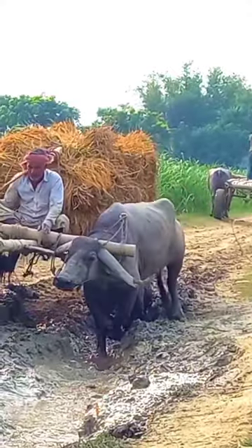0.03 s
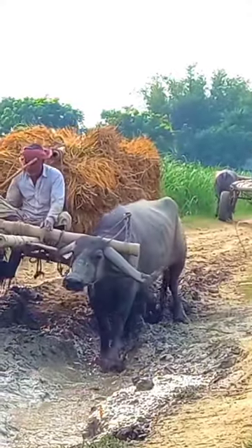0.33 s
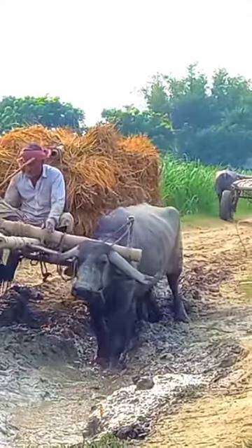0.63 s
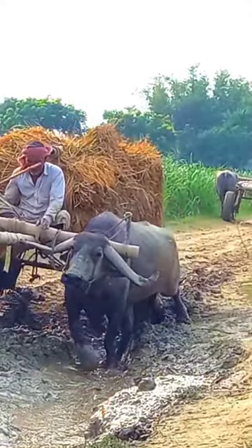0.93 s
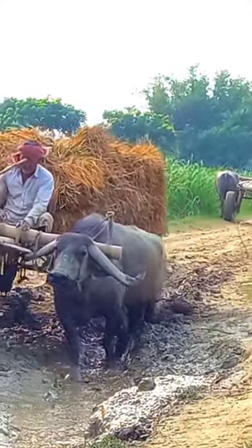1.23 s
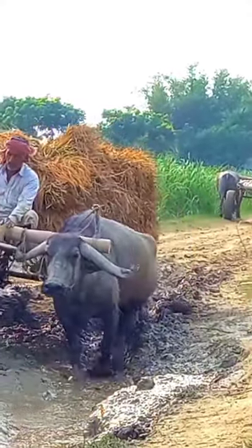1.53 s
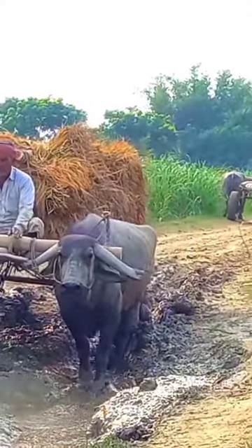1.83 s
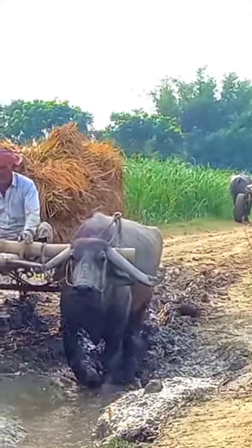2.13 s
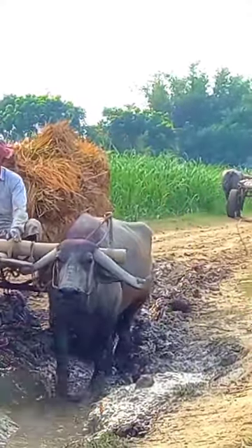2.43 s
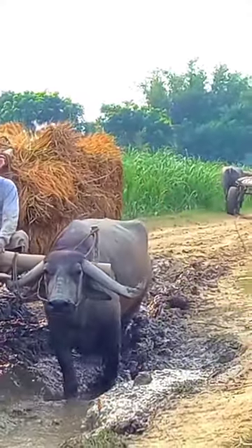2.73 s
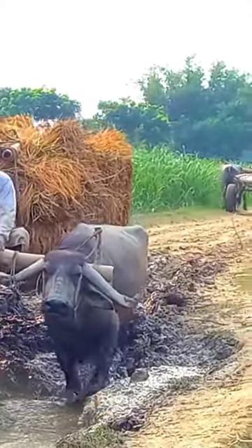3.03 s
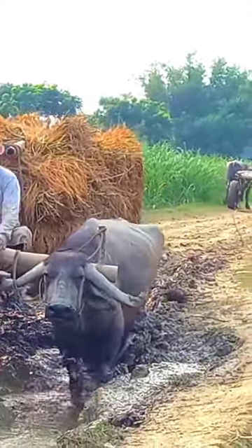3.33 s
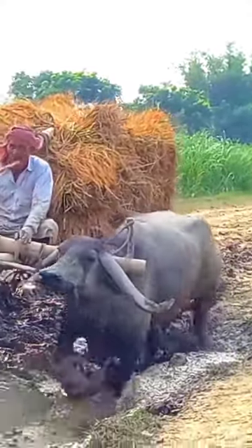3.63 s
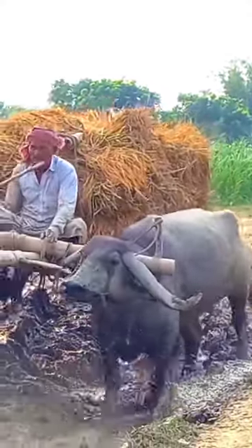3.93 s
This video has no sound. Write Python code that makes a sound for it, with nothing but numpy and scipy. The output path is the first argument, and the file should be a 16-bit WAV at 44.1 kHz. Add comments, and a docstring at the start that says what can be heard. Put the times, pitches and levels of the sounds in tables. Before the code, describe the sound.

A wading buffalo's hooves squelch and plop in wet mud, ending with a loud splash.

```python
"""A water buffalo drags a cart through deep mud into a shallow pool, coming closer, to a loud splash.
Each hoof squelches: gulping air pockets, smacking mud and a fizz of spray, all clouds of tiny bubbles.
Single cavities plop, flung mud slaps down and the soft ground thuds under the weight.
Stirred water sloshes and drips between the steps; a far bird chirps over the quiet of open fields."""
import sys
import numpy as np
from scipy import signal
from scipy.fft import rfft, irfft, next_fast_len
from scipy.io import wavfile
from scipy.ndimage import uniform_filter1d

SR = 44100
rng = np.random.default_rng(int(sys.argv[2]) if len(sys.argv) > 2 else 0)


def dump_mix(stems):
    """Bounce the given channels to the path in sys.argv[1] as a 16-bit WAV at rate SR."""
    frames = np.atleast_2d(stems).T  # one column per channel
    limited = np.clip(frames, -1, 1)  # hard clip at full scale
    pcm = np.round(limited * 32767).astype(np.int16)
    wavfile.write(sys.argv[1], SR, pcm)


N = 176400
T = np.arange(N) / SR

# tone colour of the spray hiss, with the microphone's colouring: frequency_hz, level_db
SPRAY_EQ = [(1200, -16.5), (2400, -4.5), (3100, -10.5), (4000, -6), (4800, -5), (6300, -1), (6900, -5),
            (7400, -12), (9000, -9), (11000, -5.5), (15000, -7.5)]
# stereo image of the wet sounds, widest in the treble: frequency_hz, correlation (0-1)
MUD_IMAGE = [(60, 0.45), (500, 0.89), (1100, 0.75), (2000, 0.34), (4000, 0.13), (9000, 0.05)]


def amp(db):
    """Decibels to gain."""
    return 10 ** (np.asarray(db) / 20)


def unit(x):
    """Scale to rms 1."""
    return x / np.sqrt(np.mean(x ** 2) + 1e-20)


def curve_at(points, hz):
    """Read a curve of (frequency_hz, value) points along a log frequency axis."""
    points_hz, values = np.transpose(points)
    return np.interp(np.log(hz + 1), np.log(points_hz + 1), values)


def filtered(x, response):
    """Filter x by a gain given as a function of frequency."""
    size = next_fast_len(N + 8192)
    return irfft(rfft(x, size) * response(np.fft.rfftfreq(size, 1 / SR)), size)[..., :N]


def spread(pair, eq, image):
    """Turn two unrelated signals into stereo of rms 1 with the given tone colour and image."""
    def mid_side_gains(hz):
        angle = np.arccos(np.clip(curve_at(image, hz), -1, 1)) / 2
        return amp(curve_at(eq, hz)) * np.array([np.cos(angle), np.sin(angle)])
    mid, side = filtered(pair, mid_side_gains)
    return unit(np.array([mid + side, mid - side]))


def burst(peak_s, rise_s, decay_s):
    """An envelope that swells to a peak and falls away, both exponentially."""
    exponent = np.where(T < peak_s, (T - peak_s) / rise_s, (peak_s - T) / decay_s)
    return np.exp(exponent.clip(-40, 0))


def field_air():
    """The quiet of open fields: a wide bed of low rumble and faint hiss."""
    # tone colour of the background air, with the microphone's colouring: frequency_hz, level_db
    air_eq = [(20, -46), (45, -18), (65, 6.5), (95, 5.5), (160, -3.5), (330, -9.5), (540, -14), (780, -20),
              (1400, -25.5), (2500, -26), (3100, -33), (4200, -22.5), (6300, -17), (7600, -26.5),
              (10000, -27), (15000, -34)]
    # stereo image of the air: frequency_hz, correlation (0-1)
    air_image = [(40, 0.13), (150, 0.29), (500, 0.52), (2000, 0.085), (8000, 0.072)]
    return amp(-63) * spread(rng.standard_normal((2, N)), air_eq, air_image)


def far_bird():
    """Thin chirps that arch in pitch, blurred by the trees they pass through."""
    # bird calls: centre_s, top_pitch_hz, level_db
    chirps = [(.663, 3600, -72), (1.03, 3550, -75)]
    half_length_s, arch_hz, blur_hz = 0.027, 390, 130
    blur = unit(filtered(rng.standard_normal((2, 2, N)), lambda hz: np.exp(-(hz / blur_hz) ** 2)))
    out = np.zeros((2, N))
    for centre_s, top_hz, db in chirps:
        offset = np.clip((T - centre_s) / half_length_s, -4, 4)
        phase = 2 * np.pi * np.cumsum(top_hz - arch_hz * offset ** 2) / SR
        out += amp(db) * np.exp(-offset ** 2) * (blur[0] * np.sin(phase) + blur[1] * np.cos(phase))
    return out


def cart_and_bank_echo(x):
    """A short, weak scatter from the cart and the banks that changes as the hooves move."""
    level_db, t60_s, predelay_s = -9.5, 0.1, 0.003
    width, mono_below_hz = 0.45, 1800
    t = np.arange(SR // 5) / SR
    hop = N // 20
    out = np.zeros((2, N + SR))
    for start in range(-hop, N, hop):  # each overlapping slice gets its own tail
        tail = rng.standard_normal((2, len(t))) * amp(-60 * t / t60_s) * (t > predelay_s)
        at = np.arange(max(start, 0), min(start + 2 * hop, N))
        piece = x[at] * np.sin(np.pi * (at - start) / (2 * hop))
        echo = signal.fftconvolve(piece[None], tail / np.linalg.norm(tail[0]), axes=1)
        out[:, at[0]:at[0] + echo.shape[1]] += echo
    mid, side = out[:, :N]
    side = width * filtered(side, lambda hz: hz ** 2 / (hz ** 2 + mono_below_hz ** 2))
    return amp(level_db) * np.array([mid + side, mid - side])


def ground_thuds():
    """The soft ground gives a few slow swings under each push, with a rough rumble."""
    # weight landing on soft ground: peak_s, pitch_hz, half_length_s, level_db
    thuds = [(.648, 89, 0.022, -53), (1.166, 89, 0.028, -54.5), (1.355, 100, 0.0085, -50.5),
             (1.404, 83, 0.018, -55), (2.16, 101, 0.009, -45.5), (2.194, 85.5, 0.0081, -41.5),
             (2.226, 84.6, 0.0088, -35.5), (2.573, 80, 0.02, -42), (2.7, 68, 0.022, -48.5),
             (3.302, 89, 0.0093, -45.5), (3.334, 85, 0.018, -48), (3.507, 116, 0.013, -43.5),
             (3.551, 91, 0.038, -48), (3.807, 94.5, 0.055, -53), (3.921, 101, 0.033, -46)]
    # tone colour of the rumble: frequency_hz, level_db
    rumble_eq = [(20, -15), (55, 1.5), (90, 0.5), (150, -4.5), (240, -6.5), (400, -42)]
    rumble_db, swing_left_right_db = -9, [[-1], [-3]]
    swing, weight = np.zeros(N), np.zeros(N)
    for peak_s, hz, half_length_s, db in thuds:
        envelope = amp(db) * np.exp(-np.minimum(np.abs((T - peak_s) / half_length_s) ** 1.8, 40))
        swing += envelope * np.cos(2 * np.pi * hz * (T - peak_s))
        weight += envelope
    mid, side = weight * spread(rng.standard_normal((2, N)), rumble_eq, image=[(100, 0)])
    return amp(swing_left_right_db) * swing + amp(rumble_db) * np.array([mid + side, mid - side])


def mud_slaps():
    """Gobs of flung mud land with a brief, bright snap."""
    # gobs landing: peak_s, level_db
    slaps = [(.2164, -56.5), (1.3626, -50.5), (1.8594, -47), (2.5521, -49.5), (2.738, -52), (2.9614, -54),
             (3.345, -46), (3.6855, -37), (3.84, -43)]
    envelope = sum(amp(db) * burst(peak_s, rise_s=0.001, decay_s=0.005) for peak_s, db in slaps)
    return envelope * spread(rng.standard_normal((2, N)), SPRAY_EQ, MUD_IMAGE)


def pocket_plops():
    """An air pocket tears open with a splat and rings for a few cycles while its pitch rises."""
    # single air pockets bursting: start_s, pitch_hz, level_db
    plops = [(.315, 540, -47.5), (.789, 4170, -53), (.826, 517, -44), (.826, 1470, -47.5),
             (.962, 1323, -48), (1.547, 1420, -52), (1.588, 1600, -50), (1.616, 414, -43.5),
             (1.786, 560, -47.5), (1.956, 416, -51), (1.988, 1650, -44), (2.106, 541, -38.5),
             (2.358, 553, -44), (2.637, 920, -49), (2.676, 990, -41.5), (2.689, 550, -54),
             (2.740, 1050, -50), (2.799, 890, -45), (2.808, 953, -44.5), (2.96, 2043, -43),
             (3.189, 560, -45), (3.19, 940, -47), (3.264, 2140, -47), (3.503, 1410, -44.5),
             (3.6, 2100, -39.5), (3.647, 1440, -37), (3.662, 1320, -36.5), (3.706, 1570, -38),
             (3.72, 2180, -40), (3.7603, 533, -27.5), (3.764, 590, -30), (3.777, 1595, -27),
             (3.81, 284, -37), (3.821, 592, -25), (3.865, 427, -40), (3.974, 605, -38)]
    swell_s, glide, splat_db = 0.0018, 0.058, -13
    t = np.arange(SR // 16) / SR
    out = np.zeros(N + SR)
    for start_s, hz, db in plops:
        decay_s = 0.0035 * (600 / hz) ** 0.15  # smaller pockets die sooner
        envelope = (1 - np.exp(-(t / swell_s) ** 2)) * np.exp(-t / decay_s)
        pitch_hz = hz * (1 + glide * np.tanh(t / decay_s - 1))
        ring = np.sin(2 * np.pi * np.cumsum(pitch_hz) / SR)
        octave_band = signal.butter(2, [hz / np.sqrt(2), hz * np.sqrt(2)], "band", fs=SR)
        splat = amp(splat_db) * unit(signal.lfilter(*octave_band, rng.standard_normal(len(t))))
        out[round(start_s * SR):][:len(t)] += amp(db) * envelope / envelope.max() * (ring + splat)
    return out[:N]


def bubbles(eq, low_hz, high_hz, decay_cycles, scatter_db, count, grain_samples):
    """A stereo cloud of tiny bubbles at random times and pitches, each rising as it rings out."""
    when, pitch, strength, angle = rng.random((count, 4)).T[:, :, None]
    cycles = low_hz * (high_hz / low_hz) ** pitch * np.arange(grain_samples) / SR
    age = cycles / decay_cycles
    gain = amp(scatter_db * np.minimum(-np.log(1 - strength), 4))
    envelope = gain * np.exp(-age) * (1 - np.exp(-2 * cycles))
    rings = envelope * np.sin(2 * np.pi * cycles * (1 + 0.038 * np.minimum(age, 2)))
    at = ((when * N).astype(int) + np.arange(grain_samples)).ravel()
    pair = [np.bincount(at, (rings * pan(2 * np.pi * angle)).ravel(), N)[:N] for pan in (np.cos, np.sin)]
    return spread(unit(np.array(pair)), eq, MUD_IMAGE)


def levelled(cloud):
    """Take the slow swells out of a bubble cloud and keep its grain."""
    power = uniform_filter1d(np.mean(cloud ** 2, 0), size=600)
    return cloud / np.sqrt(np.abs(power) + 1e-3)


def approach(x):
    """The splashes brighten as the buffalo comes closer."""
    # high-shelf automation: time_s, gain_db
    treble_ride = [(0, -10.5), (1.3, -2), (2.3, 0.5), (2.9, 4), (3.6, 1.5)]
    shelf_hz = 8000
    treble = filtered(x, lambda hz: 1 - 1 / (1 + (hz / shelf_hz) ** 6))
    return x + treble * (amp(np.interp(T, *np.transpose(treble_ride))) - 1)


def hoof_squelches():
    """Hooves and stirred water drive three sizes of bubble (gulp, smack, spray) and loose drips."""
    # squelches and splashes: peak_s, rise_s, decay_s, gulp_db, smack_db, spray_db
    squelches = [ (0.1, 0.0025, 0.021, -59.5, -65.5, -63.5), (0.302, 0.0011, 0.023, -59.5, -53, -57),
                 (0.402, 0.002, 0.017, -56, -66, -58.5), (0.557, 0.0041, 0.015, -52, -50, -44.5),
                 (.715, 0.0031, 0.007, -61, -62.5, -57), (0.829, 0.0073, 0.017, -54, -55.5, -53),
                 (0.963, 0.0016, 0.025, -62.5, -62.5, -84), (1.042, 0.014, 0.059, -66, -61, -62.5),
                 (1.159, 0.0087, 0.016, -73, -60.5, -66), (1.319, 0.007, 0.033, -89, -74, -55.5),
                 (1.549, 0.0012, 0.016, -54, -57.5, -55), (1.589, 0.01, 0.025, -61.5, -56, -58.5),
                 (1.65, 0.011, 0.027, -60, -59.5, -56), (1.753, 0.0037, 0.015, -57, -52.5, -48.5),
                 (1.795, 0.02, 0.039, -63.5, -55.5, -66), (1.918, 0.0023, 0.025, -70, -80, -54.5),
                 (1.955, 0.013, 0.02, -53.5, -56.5, -61), (2.023, 0.0011, 0.016, -57, -49, -48.5),
                 (2.07, 0.0071, 0.035, -59.5, -60, -53), (2.156, 0.011, 0.022, -57.5, -59.5, -76),
                 (2.221, 0.021, 0.023, -61.5, -49.5, -45.5), (2.362, .004, 0.023, -57, -55.5, -60),
                 (2.424, 0.0067, 0.026, -65, -60, -48.5), (2.489, 0.046, 0.014, -82, -54, -53),
                 (2.553, 0.0025, 0.036, -62, -60, -50), (2.675, 0.0012, 0.019, -54.5, -57, -54.5),
                 (2.737, 0.0005, 0.016, -54.5, -65, -58), (2.813, 0.017, 0.0058, -55, -50, -50),
                 (2.96, 0.0078, 0.041, -64, -61.5, -49.5), (3.135, 0.022, 0.021, -88, -55, -48.5),
                 (3.191, 0.0059, 0.02, -53.5, -49.5, -59), (3.369, 0.0076, 0.038, -62, -51.5, -48),
                 (3.502, 0.0011, 0.013, -73, -46, -53.5), (3.602, 0.0014, 0.015, -46.5, -43.5, -47),
                 (3.647, .0005, 0.021, -43.5, -47.5, -50), (3.689, 0.0081, 0.0092, -42, -52, -36),
                 (3.722, 0.004, 0.039, -45, -52, -56), (3.767, 0.003, 0.033, -40, -36.5, -46.5),
                 (3.815, 0.015, 0.0042, -34, -42, -42), (3.898, 0.019, 0.02, -46.5, -44, -40),
                 (3.961, 0.0038, 0.011, -54.5, -46.5, -47)]
    # stirred water between the steps: time_s, gulp_db, smack_db, spray_db
    slosh_ride = [(0, -73, -74, -72), (.9, -80, -74.5, -71.5), (1.25, -79, -76.5, -66.5),
                  (1.45, -92, -85, -68.5), (1.53, -69, -70, -67), (1.65, -70.5, -70.5, -65.5),
                  (1.9, -84, -68.5, -64), (2.13, -66.5, -62.5, -59.5), (2.3, -69.5, -70, -65.5),
                  (2.55, -69.5, -61.5, -60.5), (2.9, -84, -69.5, -60.5), (3.05, -96, -65.5, -58),
                  (3.302, -80, -66, -63), (3.45, -61, -63, -58.5), (3.61, -59.5, -57, -53.5),
                  (3.7, -49, -43.5, -49), (3.81, -40.5, -49, -41.5), (3.94, -93, -50, -50.5),
                  (4, -58, -63, -50.5)]
    # tone colour of gulping air pockets: frequency_hz, level_db
    gulp_eq = [(80, 3), (200, -16.5), (400, -9), (500, 2), (640, 2), (780, -9), (1100, -64)]
    # tone colour of smacking mud and drips: frequency_hz, level_db
    smack_eq = [(400, -48), (780, -18), (950, -3.5), (1200, -5), (1600, 2), (1870, -2.5), (2170, 3.5),
                (2400, -8.5), (2620, 2), (2950, -16), (5000, -58)]
    fizz_db, mist_db, drip_db = -4, -6.5, -3.5
    times_s, *slosh_db = np.transpose(slosh_ride)
    slosh = amp([np.interp(T, times_s, layer_db) for layer_db in slosh_db])
    powers = slosh ** 2
    for peak_s, rise_s, decay_s, *layers_db in squelches:
        powers += (amp(layers_db)[:, None] * burst(peak_s, rise_s, decay_s)) ** 2
    gulp = bubbles(gulp_eq, 185.8, 828, decay_cycles=1.27, scatter_db=0, count=3000, grain_samples=1000)
    smack = bubbles(smack_eq, 722, 3156, decay_cycles=4.16, scatter_db=0, count=6000, grain_samples=450)
    crackle = bubbles(SPRAY_EQ, 2656, 13800, decay_cycles=1.8, scatter_db=2, count=14000,
                      grain_samples=64)
    fizz = bubbles(SPRAY_EQ, 3000, 14500, decay_cycles=6, scatter_db=2.5, count=12000, grain_samples=200)
    mist = spread(rng.standard_normal((2, N)), SPRAY_EQ, MUD_IMAGE)
    spray = unit(crackle + amp(fizz_db) * fizz + amp(mist_db) * mist)
    body = sum(np.sqrt(power) * levelled(cloud) for power, cloud in zip(powers, (gulp, smack, spray)))
    drips = bubbles(smack_eq, 785, 2104, decay_cycles=3.9, scatter_db=5.5, count=200, grain_samples=1000)
    return body + amp(drip_db) * slosh[1] * drips  # drips ride the smack layer of the slosh


def scene():
    """The wading buffalo, a touch to the left, in open country."""
    left_lead_s = 0.00003
    wading = approach(hoof_squelches()) + pocket_plops() + mud_slaps()
    wading += cart_and_bank_echo(wading.mean(0))
    wading = filtered(wading, lambda hz: np.exp(1j * np.pi * hz * left_lead_s * np.array([[1], [-1]])))
    return wading + ground_thuds() + far_bird() + field_air()


def record(dry):
    """A brick-wall low-pass trims the very top of the mix."""
    return filtered(dry, lambda hz: hz < 15600)


dry = scene()
out = record(dry)
dump_mix(out)
```